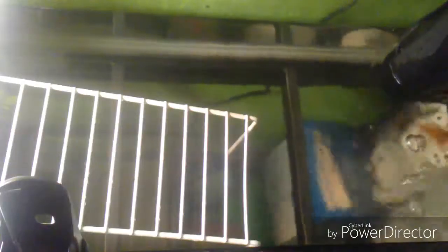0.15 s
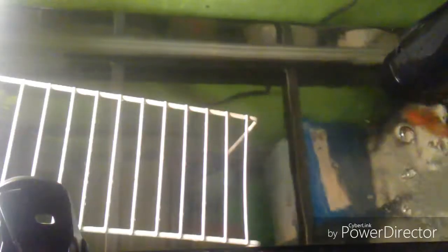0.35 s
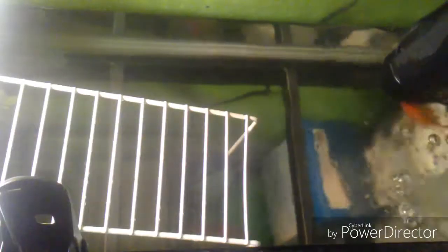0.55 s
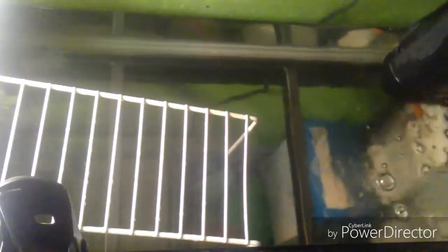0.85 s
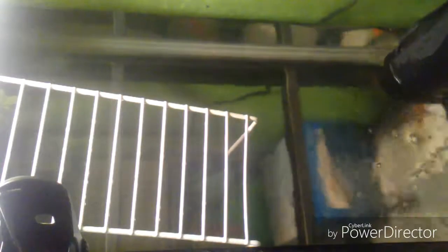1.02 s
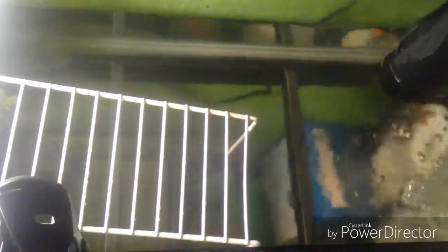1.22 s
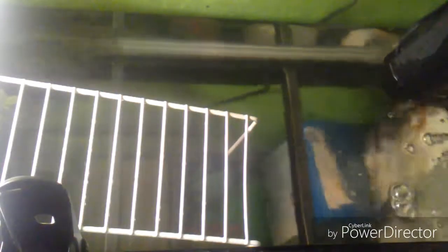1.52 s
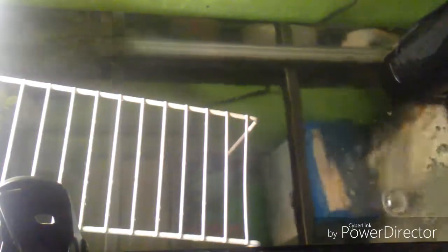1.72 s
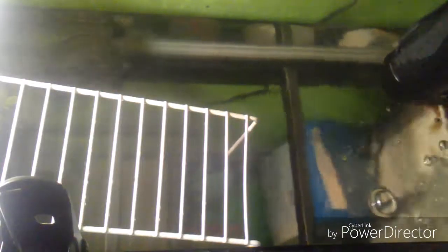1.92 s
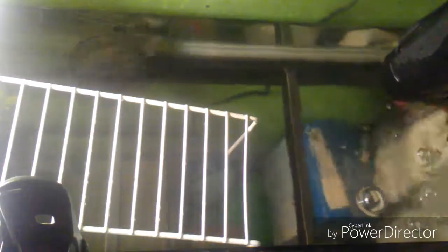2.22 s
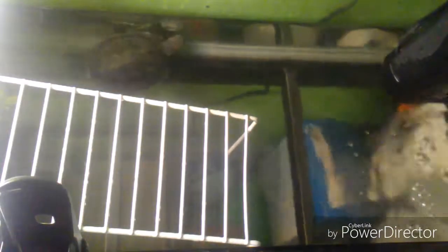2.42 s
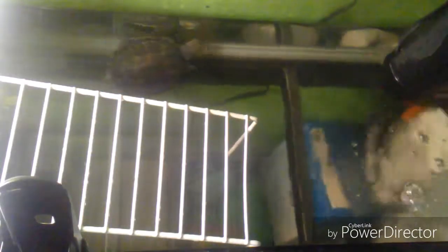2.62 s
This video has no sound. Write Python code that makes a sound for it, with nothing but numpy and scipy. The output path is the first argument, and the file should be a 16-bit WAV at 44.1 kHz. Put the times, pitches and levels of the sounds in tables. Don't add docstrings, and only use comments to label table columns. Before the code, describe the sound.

Aquarium water trickle with quick high plinking bubbles and fine fizz, then one sharp knock on glass

```python
import sys
import numpy as np
from scipy import signal
from scipy.fft import rfft, irfft
from scipy.io import wavfile
from scipy.ndimage import uniform_filter1d

SR = 44100
rng = np.random.default_rng(int(sys.argv[2]) if len(sys.argv) > 2 else 0)


def amplitude_ratio(level_db):
    exponent = np.asarray(level_db, float) / 20
    return 10 ** exponent


def dump(signal):
    limited = np.clip(np.atleast_2d(signal).T, -1, 1)
    pcm = np.round(limited * 32767).astype(np.int16)
    wavfile.write(sys.argv[1], SR, pcm)


N = 121275
RING_SAMPLES = 4096

# (time [s], peak level [dB], pitch [Hz])
SMALL_EARLY = [(0.041, -28.5, 7490), (0.1085, -22.5, 6500), (0.2018, -17, 5410), (0.322, -31.5, 6560),
               (0.3636, -19.5, 5600), (0.375, -31, 6080), (0.4118, -28.5, 5190), (0.434, -45, 5930),
               (0.4686, -32, 4380), (0.5244, -18, 6460), (0.5725, -26.5, 4400), (0.603, -22, 5730),
               (0.65, -26, 5330), (0.659, -25, 5940), (0.6914, -29, 5900), (0.784, -35, 6110),
               (0.815, -34.5, 4400), (0.8649, -22, 4670), (0.901, -25, 5370), (0.963, -34.5, 4240),
               (0.9877, -25.5, 5980), (1.052, -29.5, 5030), (1.0787, -31, 5220), (1.1282, -30, 4370),
               (1.1653, -17, 5074), (1.273, -27, 5780), (1.297, -26.5, 3770), (1.3227, -16, 6060),
               (1.325, -22, 4180)]
# (time [s], peak level [dB], pitch [Hz])
SMALL_LATE = [(1.3843, -24, 6550), (1.4616, -24.5, 6750), (1.488, -21.5, 4940), (1.51, -15, 4900),
              (1.5299, -29, 5020), (1.624, -27, 5170), (1.6463, -28, 5320), (1.6598, -24, 6780),
              (1.683, -25.5, 5850), (1.7103, -24.5, 4800), (1.728, -28, 5370), (1.7827, -17, 5240),
              (1.8208, -27, 6070), (1.92, -23.5, 4210), (1.96, -10.5, 6420), (1.985, -24.5, 5880),
              (2.0502, -29.5, 4450), (2.093, -20.5, 5730), (2.1385, -21, 6030), (2.171, -29, 6700),
              (2.209, -13.5, 6240), (2.2186, -19.5, 4750), (2.268, -18, 4520), (2.327, -22.5, 4530),
              (2.3392, -20, 4800), (2.359, -22, 5300), (2.382, -20.5, 6080), (2.3996, -18.5, 5080),
              (2.501, -24, 5210), (2.5895, -26.5, 5940), (2.648, -30.5, 4800), (2.6701, -20.5, 4280)]


def level(x, db):
    return x * amplitude_ratio(db) / np.sqrt(np.mean(x ** 2))


def unit_energy(x):
    return x / np.sqrt(np.sum(x ** 2))


def curve(table, at, log=False):
    a, b = np.array(table, float).T[:2]
    if log:
        return np.interp(np.log(at + 1), np.log(a), b)
    return np.interp(at, a, b)


def colour(x, table):
    hz = np.fft.rfftfreq(len(x), 1 / SR)
    return irfft(rfft(x) * amplitude_ratio(curve(table, hz, log=True)), len(x))


def passed(x, hz, kind, order=4):
    return signal.sosfilt(signal.butter(order, hz, kind, fs=SR, output="sos"), x)


def walk(rate):
    hold = int(SR / rate)
    steps = np.repeat(rng.standard_normal(N // hold + 1), hold)
    return 5.14 * uniform_filter1d(uniform_filter1d(steps, hold), hold)[:N]


def add(out, times, rows):
    for s, row in zip(times, rows):
        i = int(max(s, 0) * SR)
        out[i:i + len(row)] += row[:len(out) - i]


def rings(table, t):
    out = 0
    for hz, db, t60 in table:
        decay = np.exp(-np.log(1000) * t / t60)
        out = out + amplitude_ratio(db) / t60 * np.sin(2 * np.pi * hz * t) * decay
    return out


def bubble(hz, cycles, count, swell=0):
    glide, rise_cycles = 0.006, 5.0
    turns = np.asarray(hz, float)[:, None] * np.arange(count) / SR
    u = turns / cycles
    start = u ** swell * (1 - np.exp(-turns / np.minimum(rise_cycles, cycles)))
    return np.sin(2 * np.pi * turns * (1 - glide + glide * u)) * start * np.exp(-u) * (u < 9)


def tank():
    # (frequency [Hz], bandwidth [Hz], level [dB])
    air_modes = [(1210, 24, -12), (1940, 28.3, 15), (2420, 110, 10.5), (2900, 78, 7), (3150, 480, -9),
                 (3546, 60, 4.5), (4400, 97, 12), (4800, 186, 11.5), (5275, 135, 10.5), (5790, 177, 13),
                 (6560, 146, 10), (7300, 140, 6)]
    modes_db, echo_db, echo_t60_s, echo_start_s = 0.1, -5.5, 0.11, 0.004
    t = np.arange(RING_SAMPLES) / SR
    modes = rings([(hz, db, 2.26 / np.clip(width, 25, 400)) for hz, width, db in air_modes], t)
    echo = rng.standard_normal(RING_SAMPLES) * np.exp(-np.log(1000) * t / echo_t60_s)
    echo = passed(echo * (t > echo_start_s), 7500, "low", order=2)
    return (t == 0) + amplitude_ratio(modes_db) * unit_energy(modes) + amplitude_ratio(echo_db) * unit_energy(echo)


def high_hiss():
    return level(passed(rng.standard_normal(N), 4000, "high", order=2), -67)


def pump_hum():
    # (frequency [Hz], rms level [dB])
    pump_lines = [(124, -66), (215, -68.5), (301, -62.5)]
    width_hz = 8.6
    out = 0
    for hz, db in pump_lines:
        band = [hz - width_hz / 2, hz + width_hz / 2]
        out = out + level(passed(rng.standard_normal(N), band, "band", order=1), db)
    return out


def slosh():
    # (start [s], length [s], level [dB], highest frequency [Hz])
    surges = [
        (0.07, 0.15, -55, 900),
        (1.368, 0.14, -49, 1100),
        (2, 0.13, -46, 790),
        (2.284, 0.054, -42.5, 930),
        (2.578, 0.17, -47.5, 320),
    ]
    # (frequency [Hz], level [dB])
    murmur_colour = [(25, -52), (55, 2), (120, -5), (210, 4), (300, -16.5), (420, -26), (1200, -27)]
    murmur_db, flicker_db, rise_s, lowest_hz = -59.5, 1.2, 0.008, 76
    t = np.arange(N) / SR
    murmur = level(colour(rng.standard_normal(N), murmur_colour), murmur_db)
    out = murmur * amplitude_ratio(flicker_db * walk(13.53))
    noise = passed(rng.standard_normal(N), lowest_hz, "high")
    for s, length, db, hz in surges:
        rise = np.clip((t - s) / rise_s, 0, 1)
        fall = np.exp(-np.clip((t - s) / length, 0, 9) ** 3)
        out = out + level(passed(noise, hz, "low", order=2), db) * rise * fall
    return out


def fizz(box):
    # (frequency [Hz], spectral level [dB per Hz])
    fizz_colour = [(400, -5), (1190, -3), (1530, -11), (1910, -5), (3120, -7), (5740, -7.5), (6730, 0),
                   (9000, -15.5), (15500, -69)]
    # (time [s], level [dB])
    outlet_flow = [(0, 2), (.12, -2), (.2, 8.5), (.4, 1), (.5, 2), (.8, 1.5), (1.2, 2), (1.35, 5),
                   (1.75, 0.5), (1.9, -1.5), (2.0, 3.5), (2.4, 1.5), (2.55, 4.5), (2.75, 2.5)]
    fizz_db, hiss_db, per_s, spread_db, cycles = -43.0, -55, 1800, 2.6, 6.0
    when, pitch, chance = rng.random((int(per_s * N / SR), 3)).T
    hz = 600 * 16 ** (pitch ** 0.6)
    db = curve(fizz_colour, hz, log=True) - spread_db * np.log(chance + 1 / 50)
    strength = amplitude_ratio(db) * (hz / 3000) ** 1.155
    out = np.zeros(N)
    add(out, when * N / SR, bubble(hz, cycles, count=900) * strength[:, None])
    out = out * amplitude_ratio(0.68 * walk(28.07) + curve(outlet_flow, np.arange(N) / SR))
    hiss = colour(rng.standard_normal(N), fizz_colour) * amplitude_ratio(0.5 * walk(10.6))
    return level(signal.fftconvolve(out, box)[:N], fizz_db) + level(hiss, hiss_db)


def glugs():
    # (time [s], peak level [dB], pitch [Hz])
    low_tones = [(0.291, -42.5, 132), (1.342, -34.5, 119.6), (1.359, -40.5, 308), (1.957, -41.5, 209),
                 (2.015, -37, 199), (2.026, -36.5, 285), (2.062, -43, 344), (2.064, -39, 145),
                 (2.084, -37.5, 322), (2.29, -41, 318), (2.568, -36, 130), (2.586, -34.5, 300),
                 (2.61, -33.5, 147), (2.63, -31.5, 300), (2.633, -35, 106.6), (2.707, -14.5, 246),
                 (2.7133, -26.5, 130), (2.714, -21.5, 760), (2.726, -15, 300)]
    rows, out = np.array(low_tones, float), np.zeros(N)
    tones = bubble(rows[:, 2], 2.2, count=RING_SAMPLES)
    tones = tones / np.abs(tones).max(axis=1)[:, None]
    add(out, rows[:, 0], tones * amplitude_ratio(rows[:, 1])[:, None])
    return out


def knock(box):
    # (time [s], level [dB])
    contact_force = [
        (2.694, -48),
        (2.698, -21),
        (2.704, -32),
        (2.709, -25),
        (2.715, -5),
        (2.722, -13.5),
        (2.731, -18),
        (2.742, -19),
        (2.75, -25),
    ]
    # (frequency [Hz], spectral level [dB per Hz])
    contact_colour = [(24, -47), (40, -30), (260, -4.5), (653, -13.5), (1020, -5), (1560, -19),
                      (5720, -16.5), (8730, -26), (15500, -52)]
    # (frequency [Hz], level [dB], decay time T60 [s])
    panel_modes = [(130, -4.5, 0.043), (246, 0, 0.07), (300, -10, 0.17), (447.4, -1.5, 0.13),
                   (554, -3.5, 0.13), (785, -4.5, 0.049), (956, -11, 0.093)]
    panel_db, rattle_spread_db = -4.0, 1.2
    t = np.arange(N) / SR
    force = amplitude_ratio(curve(contact_force, t)) * (t > contact_force[0][0])
    rattle = rng.standard_normal(N) * amplitude_ratio(rattle_spread_db * walk(500))
    bright = level(signal.fftconvolve(colour(rattle, contact_colour), box)[:N], 0)
    panel = level(signal.fftconvolve(rattle, rings(panel_modes, t[:RING_SAMPLES]))[:N], panel_db)
    return passed((bright + panel) * force, 81, "high", order=4)


def pops(box):
    # (time [s], peak level [dB])
    bursts = [(0.2007, -30), (0.4339, -35.5), (0.5223, -29.5), (0.6898, -34.5), (1.076, -35.5),
              (1.3052, -35.5), (1.49, -33), (2.137, -29.5), (2.2493, -37), (2.588, -34.5), (2.6963, -44)]
    pop_db, snap_db, pop_s = 7, -21.0, 0.0035
    ticks_per_s, tick_db = 140, -61.0
    snaps = [(s, db + snap_db) for s, db, hz in SMALL_EARLY + SMALL_LATE]
    when, chance = rng.random((int(ticks_per_s * N / SR), 2)).T
    ticks = np.c_[when * N / SR, tick_db - 4 * np.log(chance + 0.02)]
    rows = np.vstack([bursts, snaps, ticks])
    u = np.arange(512) / SR / pop_s
    fade = np.sqrt(u) * np.exp(-u)
    out = np.zeros(N)
    add(out, rows[:, 0], rng.standard_normal((len(rows), 512)) * fade * amplitude_ratio(rows[:, 1] + pop_db)[:, None])
    out = passed(passed(out, 3800, "high", order=2), 9150, "low", order=3)
    return signal.fftconvolve(out, box)[:N]


def drops(table, cycles, db, box, near_db):
    swell, pitch_spread, spread_cycles, lead_share = 1.2, 0.0929, 30.0, 0.4
    s, peak_db, pitch = np.array(table, float).T
    u = rng.random((len(s), 6))
    group = bubble(pitch, cycles, count=RING_SAMPLES, swell=swell)
    for k in range(3):
        hz = pitch * (1 - (-1) ** k * pitch_spread * (0.22 + u[:, k]))
        late = (u[:, k + 3] - lead_share) * spread_cycles * SR / np.maximum(hz, 2500)
        shift = np.exp(-2j * np.pi * np.fft.rfftfreq(RING_SAMPLES) * late[:, None])
        near = bubble(hz, cycles, count=RING_SAMPLES, swell=swell)
        group = group + amplitude_ratio(near_db) * irfft(rfft(near) * shift)
    group = np.roll(group, 330, axis=1)
    rung = irfft(rfft(group, 2 * RING_SAMPLES) * rfft(box, 2 * RING_SAMPLES))[:, :RING_SAMPLES]
    rung = rung / np.abs(rung).max(axis=1)[:, None] * amplitude_ratio(peak_db + db)[:, None]
    out = np.zeros(N)
    add(out, s - 0.0078 - cycles / pitch, rung)
    return out


def large_drops(box):
    # (time [s], peak level [dB], pitch [Hz])
    large_bubbles = [(.239, -31.5, 1107), (.232, -49, 810), (.28, -38, 1200), (.314, -40.5, 1420),
                     (.33, -41.5, 920), (.368, -42, 1254), (.4, -46, 1000), (.525, -48, 698),
                     (.745, -43.5, 1090), (.895, -42, 910), (1.219, -42, 1210), (1.348, -39, 779),
                     (1.362, -27, 784.4), (1.365, -33.5, 894), (1.362, -32, 1084), (1.425, -30, 1062),
                     (1.432, -33.5, 1210), (1.8, -43, 1296), (1.832, -46, 641), (1.858, -42.5, 650),
                     (1.96, -45.5, 920), (1.982, -43, 1325), (2.027, -39, 640), (2.07, -44, 833),
                     (2.066, -43, 645), (2.265, -45, 909), (2.326, -38.5, 1210), (2.655, -33.5, 1210)]
    return drops(large_bubbles, 6.84, -1.5, box, near_db=-12)


def medium_drops(box):
    # (time [s], peak level [dB], pitch [Hz])
    medium_bubbles = [(0.165, -23.5, 2057), (0.2284, -28, 2900), (0.2544, -31, 2770), (0.3049, -27.5, 2023),
                      (0.4795, -22, 2840), (0.5295, -28, 2500), (0.6149, -22, 3260), (0.7272, -30.5, 2660),
                      (0.7687, -30, 1940), (0.8611, -31, 1970), (0.9864, -29, 1940), (1.0762, -30, 2340),
                      (1.1662, -27.5, 2740), (1.2946, -24, 2870), (1.3598, -20.5, 2713), (1.3848, -27, 2066),
                      (1.4451, -38, 2420), (1.5758, -34.5, 2160), (1.7345, -31, 1950), (1.7938, -35, 1940),
                      (1.919, -25, 3530), (1.9375, -26.5, 3230), (2.0792, -26, 3330), (2.155, -29.5, 1940),
                      (2.208, -31.5, 1956), (2.3843, -31.5, 1936), (2.495, -29.5, 2140), (2.6703, -20, 3430),
                      (0.145, -40, 1940), (0.2781, -41, 1910), (0.4304, -31, 3600), (0.4589, -43, 2850),
                   (0.5736, -34, 2190), (0.6405, -29.5, 2870), (0.6694, -30, 3400), (0.6785, -35, 2250),
                   (0.782, -30.5, 1780), (1.0244, -34, 1996), (1.062, -44, 2330), (1.1149, -35, 1940),
                   (1.4272, -33, 2110), (1.5289, -51, 2080), (1.6447, -39, 1950), (1.689, -36, 2900),
                   (1.749, -30.5, 2610), (1.7603, -32, 2830), (1.959, -29, 2880), (2.0995, -31, 2800),
                   (2.1315, -29, 3530), (2.3265, -36.5, 1960), (2.4072, -30, 1940), (2.4714, -40, 2490),
                   (2.5939, -40.5, 1910), (2.6374, -37, 1850)]
    return drops(medium_bubbles, 4.485, -1.5, box, near_db=-9)


def small_drops(box):
    # (time [s], peak level [dB], pitch [Hz])
    tiny_bubbles = [
        (0.6562, -32, 7600),
        (1.488, -37, 7860),
        (2.1105, -35, 7460),
        (2.368, -42.5, 7740),
        (2.6055, -35.5, 8220),
    ]
    return drops(SMALL_EARLY + SMALL_LATE + tiny_bubbles, 3.98, 0.1, box, near_db=-9)


def scene():
    box = tank()
    background = high_hiss() + pump_hum() + slosh()
    water = fizz(box) + glugs() + pops(box)
    trickle = large_drops(box) + medium_drops(box) + small_drops(box)
    return (background + water + knock(box) + trickle)[None]


def top_cut(x):
    return signal.sosfilt(signal.butter(12, 16170, fs=SR, output="sos"), x)


def record(dry):
    ceiling, top_hz = 1.5, 15650
    rounded = ceiling * np.tanh(dry / ceiling)
    mix = signal.sosfilt(signal.ellip(12, 0.2, 70, top_hz, fs=SR, output="sos"), rounded)
    return top_cut(mix)


dry = scene()
out = record(dry)
dump(out)
```